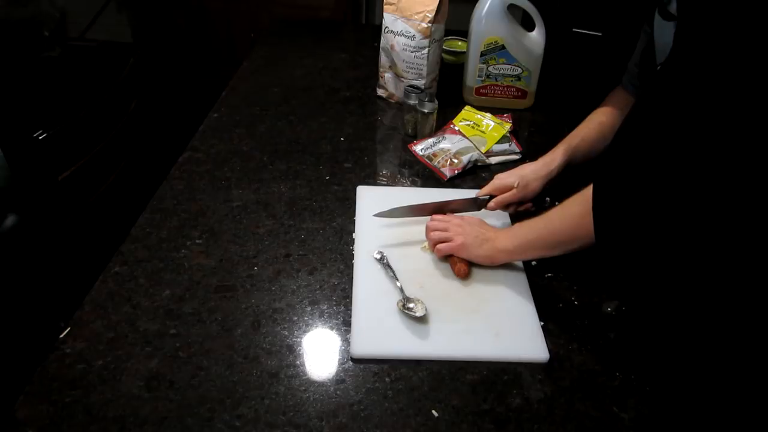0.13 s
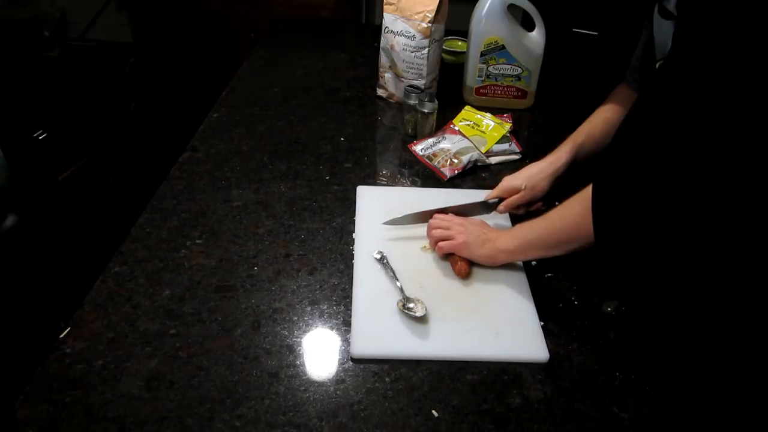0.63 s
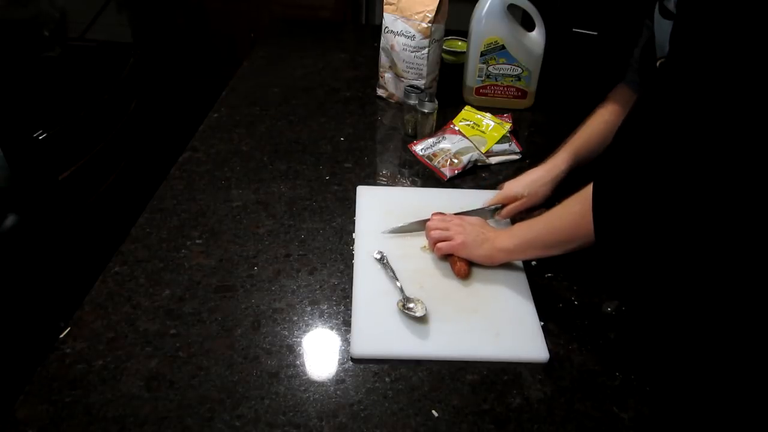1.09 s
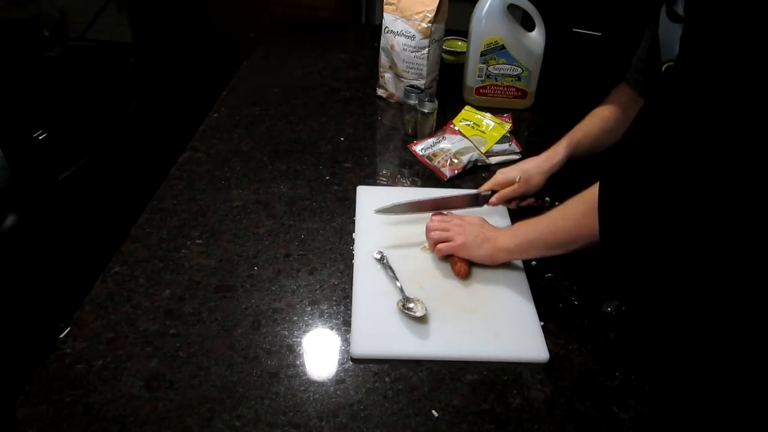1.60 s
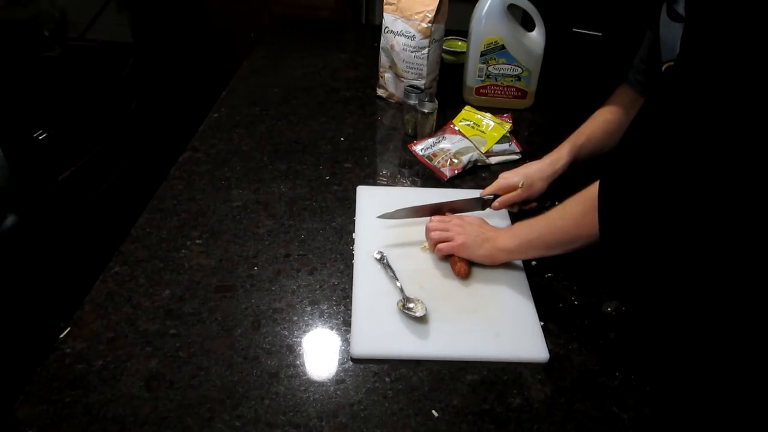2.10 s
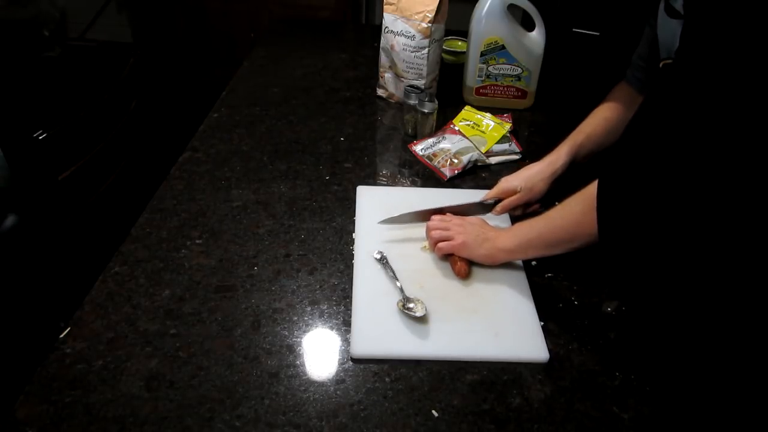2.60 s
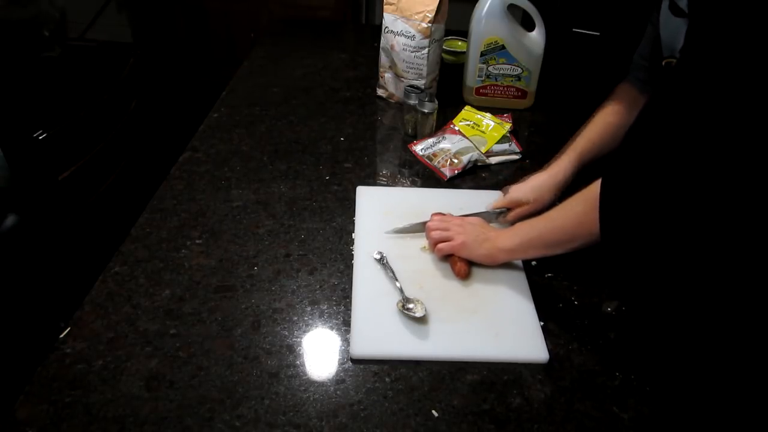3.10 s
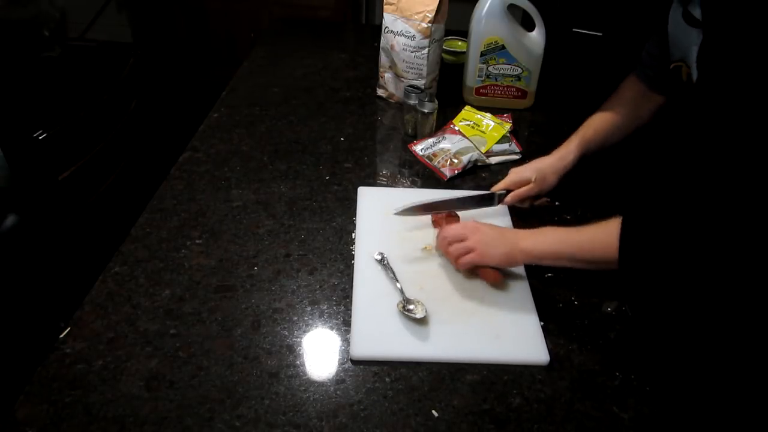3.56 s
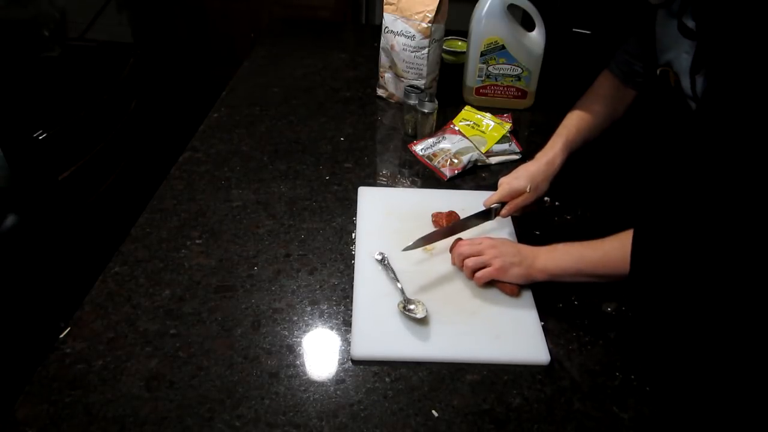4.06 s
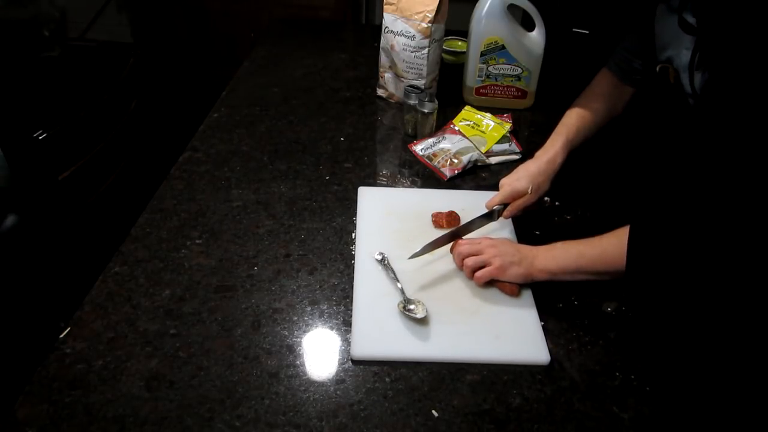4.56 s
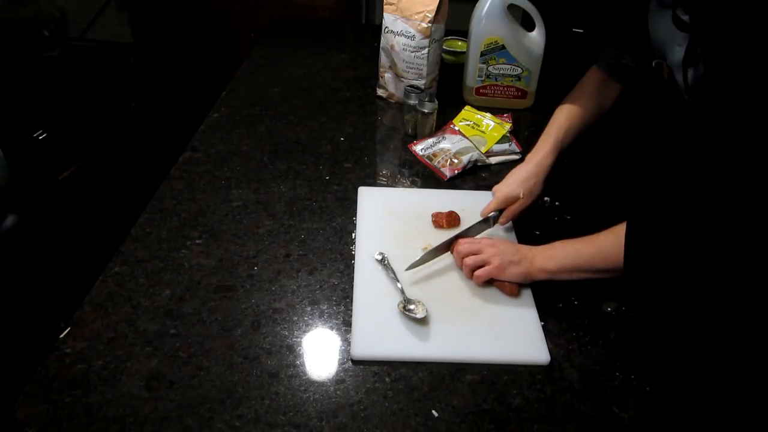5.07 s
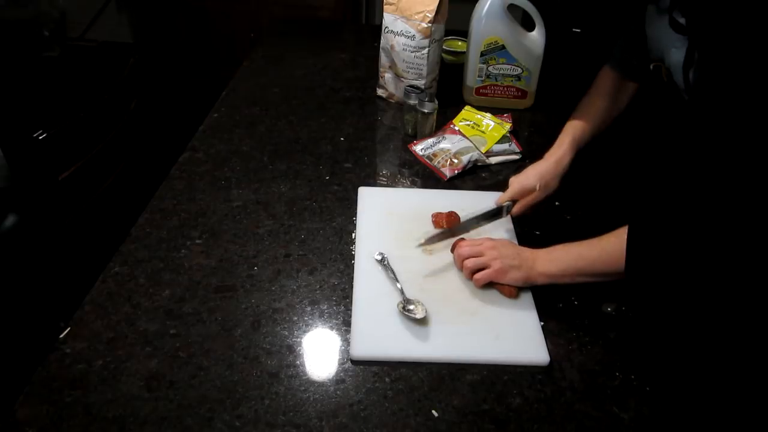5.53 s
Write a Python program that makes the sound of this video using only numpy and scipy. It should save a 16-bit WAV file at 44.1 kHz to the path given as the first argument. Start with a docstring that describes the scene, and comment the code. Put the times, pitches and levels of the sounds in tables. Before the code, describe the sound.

A quiet, low-leaning house murmur with a faint wavering appliance hum runs throughout, in close, nearly centred stereo. At 0.26 s a knife tip makes a tiny dead double tick on a plastic board. Four soft, breathy sawing strokes follow from 0.4 to 0.9 s, then a strong clack at 0.92 s, with a short hollow mid-pitched ring, steel click and hard kitchen reflections. Faint slicing continues to 1.5 s; after a pause, a barely audible click comes at 2.15 s and strokes grow from 2.3 s. Another firm knock lands at 3.0 s, followed by the clearest hissing draw and fainter dragging. A softer, duller double contact falls at 3.71 s, with a faint drag until 4.2 s. After a lull, light strokes from 4.7 s lead to the loudest chop at 5.25 s: an abrupt, bright crack, peaks flattened and quickly held down, its room tail dying away.

```python
"""A chef's knife on a plastic board on a stone counter, in a hard-walled kitchen, taken with close stereo ports.
The air of the house murmurs throughout, as shaped noise with a wavering drone. The tip taps the board at 0.26 s,
then the blade saws through a sausage, its hiss made of tiny slips. From 0.92 s edge knocks fall among the strokes,
each a force pulse ringing the board's modes, plus a steel click; the room answers with echoes and a dense tail.
The hardest chop lands at 5.25 s, held down by a limiter."""
import sys
import numpy as np
from scipy import signal
from scipy.io import wavfile
from scipy.ndimage import uniform_filter1d

SR = 44100
rng = np.random.default_rng(int(sys.argv[2]) if len(sys.argv) > 2 else 0)


def makeup_ratio(level_db):
    """Linear amplitude ratio for a level in decibels (20 dB per factor of ten)."""
    decades = np.asarray(level_db, float) / 20
    return 10 ** decades


def file_out(sig):
    """Save sig as 16-bit WAV at sys.argv[1]."""
    # one column per channel
    cols = np.atleast_2d(sig).T
    # limit, then scale
    lim = np.clip(cols, -1, 1)
    pcm = np.round(lim * 32767).astype(np.int16)
    wavfile.write(sys.argv[1], SR, pcm)


N = 250047  # length in samples

# spectrum of the house air: (f/Hz, relative density level/dB)
AIR_SPECTRUM = [(15, -14), (25, -13), (114, -6), (206, -9), (236, -2.5), (277, -11), (326, -6), (427, -9),
                (575, -10), (695, -12), (754, -11), (1040, -12.5), (2350, -16), (9840, -35.5),
                (16000, -51.5)]
# likeness of the air at the left and right ports: (f/Hz, likeness 0-1)
AIR_LIKENESS = [(60, 0.76), (180, 0.68), (550, 0.61), (1650, 0.72), (4970, 0.81), (15000, 0.87)]
# an appliance's unsteady drone, before the channel balance: (f/Hz, level/dB)
DRONE = [(118, -78), (236, -70.5)]
AIR_DB = -57  # rms of the air without drone, before the channel balance

# the knife tip touches the board: (t/s, level/dB, contact time/ms)
TIP_TAPS = [(.2553, -43.5, 0.37), (.2603, -40, 0.32), (.903, -50, 1)]
# a touch of the tip is dead and sends little to the walls
TAP_PLACE, TAP_CLICK_DB, TAP_RING_SHARE, TAP_WALL_DB = 0.23, -4, 0.25, -9

# blade meets board: (t/s, blow level/dB, contact time/ms, place along the board 0-1, edge click level/dB re blow,
# share of the free ring time left by the blade and hand pressing on the board 0-1)
KNOCKS = [(.9170, -16, 0.51, 0.37, -4, 1.0), (2.147, -52.5, 0.23, 0.42, 11, .6),
          (2.968, -52, 1.05, 0.12, 1, .6), (2.993, -49, 1.4, 0.1, -25, .6),
          (3.0050, -20, 0.62, 0.03, -5, 0.7), (3.7103, -33, 1.13, 0.46, -24, 0.47),
          (3.7131, -41, 0.33, 1, 16, 0.5), (5.2525, -3, 0.46, 0.12, 9, .45)]
# modes of the board on the stone: (f/Hz, relative level/dB, free t60/s)
BOARD_MODES = [(234, -35, .05), (458, -21.5, 0.15), (600, -10, 0.084), (750, 2.5, 0.14), (1110, -2, 0.055),
               (1315.4, 9.5, 0.12), (1455, 2.5, 0.066), (1652, 7.5, 0.061), (1743, 10, 0.04),
               (1946, 10, 0.045), (2260, -18, .03), (3040, -19, .05), (3500, -19, 0.02), (4250, -22, .03),
               (5550, -14, .02)]
# spectrum of the steel edge's click before its brightness tilt: (f/Hz, relative level/dB)
EDGE_CLICK = [(60, -49), (200, -65.5), (700, -25), (1500, 5.5), (2300, 3), (2700, 7.5), (3300, 8.5),
              (4300, 4), (5200, -2), (8000, -11), (12000, -36), (16000, -48)]
# the harder the blow, the duller its click: tilt at a 0 dB blow (dB an octave), and its change per dB of blow
BRIGHT_DB, BRIGHT_PER_DB = -2, -0.08
KNOCK_WALL_DB = 1.1  # share of each knock sent to the walls
SIDEWAYS_T60 = 0.026  # the flat board beams its ring upwards; the walls get mostly the blow (s)

# each stroke of sawing or dragging the blade: (start t/s, length/s, peak friction level/dB)
STROKES = [(0.377, .16, -72), (0.544, .16, -69.5), (0.687, 0.15, -67.5), (0.855, .08, -68),
           (1.104, 0.14, -64), (1.22, 0.3, -74), (2.32, .14, -75), (2.46, 0.15, -73.5), (2.61, .17, -70),
           (2.79, 0.15, -68.5), (2.948, 0.047, -63.5), (3.092, .18, -60), (3.24, 0.42, -71),
           (3.544, 0.21, -71), (3.85, 0.32, -74.5), (4.707, .2, -69.5), (4.896, .12, -71.5),
           (5.01, .14, -71.5), (5.153, .11, -70.5)]
# spectrum of blade friction: (f/Hz, relative density level/dB)
FRICTION = [(300, -17), (800, 4), (1800, 3), (3500, 1.5), (6500, -5), (9000, -17), (11500, -28),
            (14000, -25), (16000, -40.5)]
STROKE_PEAK = 0.41  # the blade is fastest at this share of a stroke

# first echoes off counter, wall and cupboards: (delay t/ms, gain)
ECHOES = [(1.1, 0.86), (3.8, 0.61), (7.5, 0.48), (9.2, 0.26), (19.6, 0.22), (27, 0.076), (36, 0.39)]
# dying away of the kitchen's walls: (f/Hz, t60/s)
KITCHEN_DECAY = [(60, 0.82), (150, 0.42), (400, 0.54), (1040, 0.57), (2760, 0.54), (7280, 0.53),
                 (14000, 0.12)]
# colour of the walls' answer: (f/Hz, relative level/dB)
TAIL_COLOUR = [(60, 11), (150, -1.5), (320, 2), (520, 3), (750, 5), (1000, -2), (1500, 3), (2600, -0.5),
               (3400, -0.5), (6000, 1.5), (12000, -2.5)]
ECHO_HZ = 6340  # the echoes come back duller above this
NEAR_DB, NEAR_T60 = 3, 0.075  # counter and cupboards scatter strongly at first: dB over the walls, s
# middle of the tail, its side re the middle, and the lean to the left: left up, right down by this
TAIL_DB, TAIL_SIDE_DB, LEFT_DB = 6.5, -19, 0.56

BASS_CUT_HZ = 77  # the recorder's output rolls off below this
CLIP = 0.91  # the waveform is cut off flat here, ahead of the bass cut


def evened(x):
    """Scales to rms 1."""
    return x / np.sqrt(np.mean(x ** 2) + 1e-20)


def read(points, hz):
    """Reads a table along log frequency."""
    f, value = np.transpose(points)
    return np.interp(np.log(hz + 1), np.log(f + 1), value)


def add(mix, s, sound):
    """Mixes a sound in at time s."""
    part = mix[round(s * SR):][:len(sound)]
    part += sound[:len(part)]


def colour(points, size=2048):
    """Causal (minimum-phase) impulse response of energy 1 with the given spectrum."""
    log_gain = np.log(makeup_ratio(read(points, abs(np.fft.fftfreq(size, 1 / SR)))))
    taps = np.fft.ifft(np.exp(np.conj(signal.hilbert(log_gain)))).real
    return taps / np.linalg.norm(taps)


def air():
    """Random short-time spectra with faint drifting patches, plus a wavering drone."""
    frames, hz = N // 256 + 5, np.fft.rfftfreq(1024, 1 / SR)
    a, b, c, d, patches = rng.standard_normal((frames, 513, 5)).T
    patches = uniform_filter1d(patches, 20, 0)  # smooth over frequency
    patches = evened(uniform_filter1d(patches, 20, 1))  # and over time
    same = np.clip(read(AIR_LIKENESS, hz), -1, 1)[:, None]
    left = a + 1j * b
    right = same * left + np.sqrt(1 - same ** 2) * (c + 1j * d)
    spectra = np.array([left, right]) * makeup_ratio(read(AIR_SPECTRUM, hz)[:, None] + 0.67 * patches)
    murmur = signal.istft(spectra, nperseg=1024, noverlap=768)[1][:, :N]
    out = makeup_ratio(AIR_DB) * evened(murmur)
    for tone_hz, db in DRONE:
        waver = uniform_filter1d(rng.standard_normal(N), 2500)
        waver = evened(uniform_filter1d(waver, 2500))
        out += makeup_ratio(db) * waver * np.sin(2 * np.pi * tone_hz * np.arange(N) / SR)
    return out * makeup_ratio([[0.3], [-0.3]])


def knock(db, contact_ms, place, click_db, ring_share):
    """A smooth force pulse rings the board's modes; the steel edge adds a click."""
    t = np.arange(8192) / SR
    force = np.sin(np.pi * np.minimum(1000 * t / contact_ms, 1)) ** 2
    ring = np.zeros(len(t))
    for k, (hz, level_db, t60) in enumerate(BOARD_MODES):
        # the place of the blow lies nearer the belly of some modes than of others
        belly = 1 + 0.23 * np.cos(np.pi * k * place)
        ring += belly * makeup_ratio(level_db - 60 * t / (t60 * ring_share)) * np.sin(2 * np.pi * hz * t)
    thin = signal.butter(4, 205, "high", fs=SR)  # a thin board radiates no deep bass
    sound = signal.lfilter(*thin, signal.fftconvolve(force, ring)[:len(t)])
    sound /= abs(sound).max()
    bright_db = BRIGHT_DB + BRIGHT_PER_DB * db
    click = [(hz, level_db + bright_db * np.log2(hz / 3000)) for hz, level_db in EDGE_CLICK]
    add(sound, 0, makeup_ratio(click_db) * colour(click))
    return makeup_ratio(db) * sound


def blade():
    """Dense tiny slips of steel on skin and plastic, swelling and fading with each stroke."""
    slips = rng.standard_normal(N) * makeup_ratio(2 * rng.exponential(1, N))
    hiss = evened(signal.oaconvolve(slips, colour(FRICTION))[:N])
    level = np.zeros(N)
    for s, length, db in STROKES:
        share = np.arange(0, length, 1 / SR) / length
        progress = np.interp(share, [0, STROKE_PEAK, 1], [0, 0.5, 1])
        add(level, s, makeup_ratio(db) * np.sin(np.pi * progress))
    return level * hiss


def kitchen(near, walls):
    """Direct sound, a few echoes, then a dense tail dying by band; close ports hear nearly the same."""
    # sparse random reflections, one in every 20 samples
    taps = np.zeros((2, SR))
    at = np.arange(100, SR - 20, 20) + rng.integers(0, 20, (2, (SR - 101) // 20))
    np.put_along_axis(taps, at, rng.choice([-1., 1.], at.shape), 1)
    hz, t, z = signal.stft(taps, SR, nperseg=512)
    build_up = 1 - np.exp(-t * (hz[:, None] + 1) / 3.3)  # bass needs a few cycles to fill the room
    dying = makeup_ratio(-60 * t / read(KITCHEN_DECAY, hz)[:, None]) + makeup_ratio(NEAR_DB - 60 * t / NEAR_T60)
    z *= build_up * makeup_ratio(read(TAIL_COLOUR, hz)[:, None]) * dying
    mid, side = signal.istft(z, SR, nperseg=512)[1][:, :SR]
    mid, side = makeup_ratio([[TAIL_DB], [TAIL_DB + TAIL_SIDE_DB]]) * [mid, side] / np.linalg.norm(mid)
    early = np.zeros(SR // 10)
    early[0] = 1  # direct sound
    for ms, gain in ECHOES:
        add(early, ms / 1000, gain * signal.firwin(15, ECHO_HZ, fs=SR))
    direct = signal.fftconvolve(near, early)[:N]
    tail = signal.fftconvolve(walls[None], [mid + side, mid - side], axes=1)[:, :N]
    return makeup_ratio([[LEFT_DB], [-LEFT_DB]]) * (direct + tail)


def scene():
    """Taps, strokes and knocks in the kitchen, over the air of the house."""
    near = blade()
    walls = makeup_ratio(-1.5) * near
    blows = [(s, knock(*blow), KNOCK_WALL_DB) for s, *blow in KNOCKS]
    for s, db, contact_ms in TIP_TAPS:
        tap = knock(db, contact_ms, TAP_PLACE, TAP_CLICK_DB, TAP_RING_SHARE)
        blows.append((s, tap, TAP_WALL_DB))
    for s, sound, wall_db in blows:
        t = np.arange(len(sound)) / SR
        add(near, s, sound)
        add(walls, s, sound * makeup_ratio(wall_db - 60 * t / SIDEWAYS_T60))
    return kitchen(near, walls) + air()


def band_limit(x):
    """A steep low-pass at the top of the band."""
    return signal.sosfilt(signal.butter(12, 16360, fs=SR, output="sos"), x)


def record(dry):
    """A limiter catches the chop a moment late, the first peaks clipping, and follows its tail down."""
    keep = np.exp(-1 / (0.00032 * SR))  # power averaged over 0.32 ms
    power = signal.lfilter([1 - keep], [1, -keep], (dry ** 2).mean(0))
    power_db = 10 * np.log10(power + 1e-12)
    fall = np.arange(N) * 790 / SR  # recovery at 790 dB a second
    held_peak_db = np.maximum.accumulate(power_db + fall) - fall
    over_db = np.maximum(held_peak_db + 15.5, 0)  # threshold -15.5 dB
    lag = signal.windows.hann(260)  # the gain answers late and smoothly
    cut_db = 1.14 * signal.fftconvolve(over_db, lag / lag.sum())[:N]
    clipped = np.clip(dry / makeup_ratio(cut_db), -CLIP, CLIP)
    bass_cut = signal.butter(2, BASS_CUT_HZ, "high", fs=SR)
    return band_limit(signal.lfilter(*bass_cut, clipped))


dry = scene()
out = record(dry)
file_out(out)
```